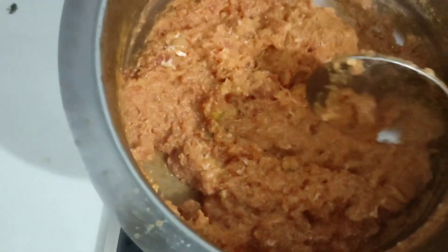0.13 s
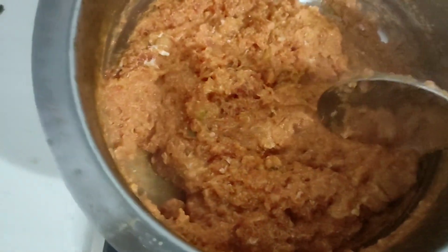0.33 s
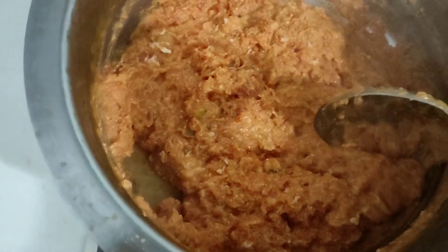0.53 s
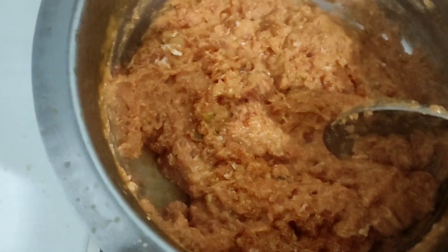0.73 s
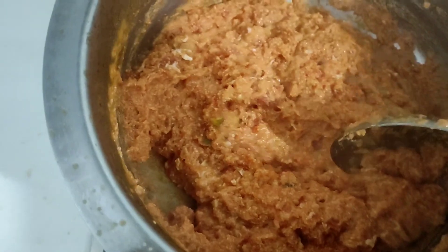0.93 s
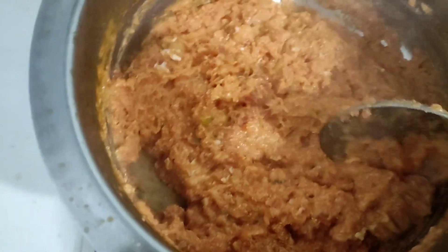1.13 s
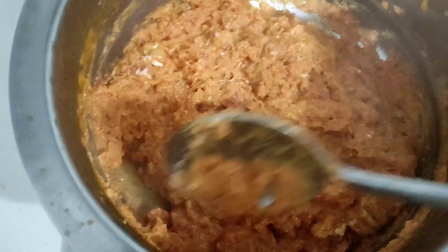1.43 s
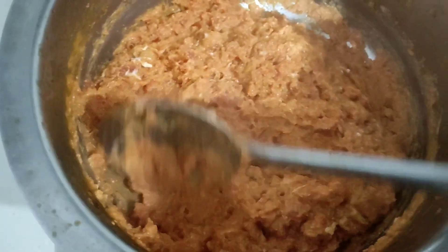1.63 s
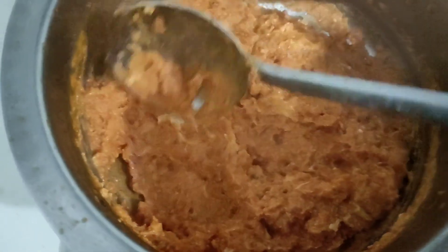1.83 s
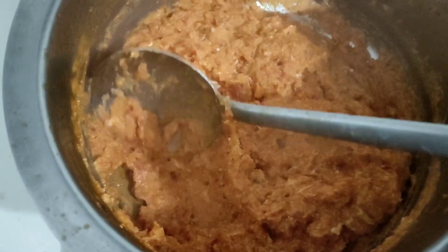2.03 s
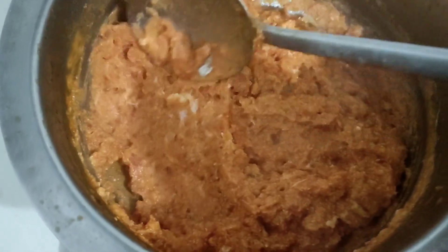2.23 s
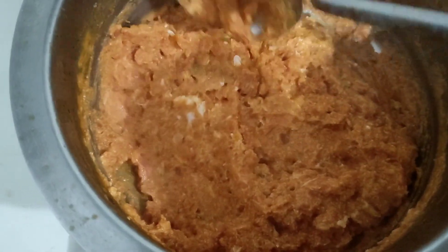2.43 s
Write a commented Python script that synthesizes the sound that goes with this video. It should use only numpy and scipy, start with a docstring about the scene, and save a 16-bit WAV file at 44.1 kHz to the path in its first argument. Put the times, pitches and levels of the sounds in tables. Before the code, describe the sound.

A metal spoon clanks twice on a steel pot of thick food, drags with low hollow groans, taps softly, then strikes one loud ringing clank; faint flame and sizzle behind, close stereo microphone in a small kitchen.

```python
"""Close by, a spoon knocks the wall of a steel pot of thick food, and the wall rings; between the knocks
it drags along the bottom and the loaded pot groans. Behind it the food spits and a flame rumbles.
Knocks are cracks plus decaying modes, groans are sines swayed by random slips, spits and pats are puffs of
noise, the flame is wavering bands of noise, and a low sine hums. Two microphone ports hear it, a few
centimetres apart."""
import sys
import numpy as np
from scipy import signal
from scipy.fft import rfft, irfft, next_fast_len
from scipy.io import wavfile

SR = 44100
rng = np.random.default_rng(int(sys.argv[2]) if len(sys.argv) > 2 else 0)


def wrap_up_sound(samples):
    """Save the sound to the file named by the first command line argument, as 16-bit audio."""
    columns = np.atleast_2d(samples).T
    # keep every value between -1 and 1, then stretch to whole-number steps
    tamed = np.clip(columns, -1, 1)
    steps = np.round(tamed * 32767).astype(np.int16)
    wavfile.write(sys.argv[1], SR, steps)


N = 114660
T = np.arange(N) / SR

HUM_HZ, HUM_DB = 114.5, -48.5
STOVE_DB = -44   # flame and steady sizzle together

SPIT_HALF_WIDTH_HZ, SPIT_LOSS_DB, SPIT_S = 1200, -5, .007
PAT_T60_S = 0.025

LOW_WIDTH_HZ, UPPER_WIDTH_HZ = 37, 50   # how fast the slips sway each groan
SIDE_HZ, SIDE_DB = -41, -7   # a weaker neighbour rides beside the upper groan
SLIPS_PER_S = 1400
GRIT_HZ, GRIT_DB, GRIT_FOLLOWS = 960, -21.5, 0.75   # FOLLOWS: dB gained per dB of drag force
RASP_DB, RASP_FOLLOWS = -16.5, 1.26   # bright grain, growing faster than the force

CRACK_HZ, CRACK_T60_S = 6500, .012
BLOOM_S = 0.005   # the clear modes swell up after the blow
LESSER_MODES, THICKET_DB = 550, -30
APART = 1   # how differently the two ports hear each lesser mode
SLIDE_DB = -5.5   # the spoon slides on after a knock and keeps feeding the crowd
BOTTOM_T60_S = .24
PUFF_HZ, PUFF_DB, PUFF_T60_S = 830, -8.5, 0.29   # broad dull part of each thud

LAG_S, ROOM_DB, ROOM_T60_S = 0.00018, -7.5, 0.042
CEILING, CUTOFF_HZ = .85, 16400


def amp(db):
    """Amplitude factor of a level in dB."""
    return 10 ** (np.asarray(db) / 20)


def unit(x):
    """Scale to rms 1."""
    return x / np.sqrt(np.mean(x ** 2) + 1e-20)


def in_time(rows):
    """Join the rows of a table by straight lines; one curve per column after the time."""
    s, *columns = np.transpose(rows)
    return [np.interp(T, s, column) for column in columns]


def at_hz(points, hz):
    """Read a table of (frequency, value) along a logarithmic frequency axis."""
    points = np.array(points)
    return np.interp(np.log(hz), np.log(points[:, 0]), points[:, 1])


def drift(rate_hz):
    """Slow chance of spread 1: low-passed noise made at every 40th sample."""
    r = np.exp(-80 * np.pi * rate_hz / SR)
    rough = rng.standard_normal(N // 40 + 2002)
    slow = signal.lfilter([1], [1, -2 * r, r * r], rough)[2000:]   # drop the run-in
    return np.interp(np.arange(N) / 40, np.arange(len(slow)), unit(slow))


def add(out, s, x):
    """Mix x into out from time s."""
    i = int(s * SR)
    out[..., i:i + x.shape[-1]] += x[..., :N - i]


def band(x, low_hz, high_hz):
    """Keep the sound between two frequencies."""
    edges = [max(low_hz, 10), min(high_hz, .45 * SR)]
    return signal.sosfilt(signal.butter(2, edges, "band", fs=SR, output="sos"), x)


def narrow(x, width_hz):
    """Low-pass that turns a rough signal into the sway of a mode; rms 1."""
    r = np.exp(-np.pi * width_hz / SR)
    return unit(signal.lfilter([1], [1, -2 * r, r * r], x))


def modes(hz, t60):
    """One decaying sine per row, with a soft first millisecond."""
    t = T[:2 * SR // 3]
    sines = np.sin(2 * np.pi * np.outer(hz, t))
    return sines * amp(-60 * t / np.array(t60)[:, None]) * np.minimum(t * 1000, 1)


def low_hum():
    """A sine wavering slowly in level and phase."""
    level = amp(HUM_DB + 2.2 * drift(7.7))
    return level * np.sin(2 * np.pi * HUM_HZ * T + drift(5.5))


def flame(patchy_db):
    """Rumble of the flame and steady sizzle: third-octave bands of stereo noise, each flickering; rms 1."""
    # noise density: (frequency [Hz], relative level per Hz [dB])
    spectrum = [(25, -40), (60, -67), (90, -9.5), (114, -5), (150, -12), (250, -15.5), (400, -18),
                (700, -27), (1500, -30), (3000, -27.5), (6300, -32), (7200, -30.5), (8600, -30.5),
                (11000, -31.5), (16000, -42)]
    # how alike the two ports hear the noise: (frequency [Hz], left-right likeness [-1 to 1])
    likeness = [(130, 0.97), (600, 0.65), (1500, -0.21), (15000, 0.46)]
    out, together = 0, drift(4.0)
    edges = 25 * 2 ** np.arange(0, 9.5, 1 / 3)
    white = rng.standard_normal((2, 2, N))
    for k, (low, high) in enumerate(zip(edges, edges[1:])):
        hz = np.sqrt(low * high)
        if spectrum[0][0] < hz < spectrum[-1][0]:
            mid, side = band(white[k % 2], low, high)
            alike = np.clip(at_hz(likeness, hz), -1, 1)
            flicker_db = patchy_db * (0.79 * together + drift(10.7))
            gain = amp(at_hz(spectrum, hz) + flicker_db)
            out = out + gain * (np.sqrt(1 + alike) * mid + np.sqrt(1 - alike) * side * [[1], [-1]])
    return unit(out)


def food():
    """Soft pats of the spoon are dull decaying noise; spits of hot fat are short bright puffs."""
    # pats on the food: (time [s], level at the start [dB])
    pats = [(1.669, -41), (1.754, -35), (1.793, -41), (1.874, -39), (1.925, -38), (2.523, -34)]
    # spits: (time [s], level before SPIT_LOSS_DB [dB], centre frequency [Hz])
    spits = [(0.459, -33.5, 6350), (0.9387, -28, 3260), (1.277, -30, 7600), (1.6333, -34, 6880),
             (2.1828, -27.5, 7500), (2.2493, -32, 8400)]
    out = np.zeros(N)
    for s, db in pats:
        thump = unit(band(rng.standard_normal(2000), 210, 2080))
        add(out, s, amp(db - 60 * T[:2000] / PAT_T60_S) * thump)
    t = T[:4000] / SPIT_S
    swell = np.sqrt(np.minimum(8 * t, 1)) * np.exp(-t ** 2)
    for s, db, hz in spits:
        puff = unit(band(rng.standard_normal(4000), hz - SPIT_HALF_WIDTH_HZ, hz + SPIT_HALF_WIDTH_HZ))
        add(out, s, amp(db + SPIT_LOSS_DB) * puff * swell)
    return out


def groan(slips, hz, width_hz, steady):
    """A low mode kept swaying by the slips in level and phase, around a steady part; rms 1."""
    phase = 2 * np.pi * np.cumsum(hz) / SR
    in_step = (steady + narrow(slips[0], width_hz)) * np.cos(phase)
    across = narrow(slips[1], width_hz) * np.sin(phase)
    return unit(in_step + across)


def drag():
    """Dense uneven slips keep the low modes swaying and leave a dull grit and a bright rasp around them."""
    # force of the drag: (time [s], low groan level [dB], upper groan level [dB])
    force = [(.3, -33.5, -68), (.335, -33.5, -19.5), (.372, -28.5, -34), (.43, -42, -29.5),
             (.53, -32, -28.5), (.545, -20, -19), (.616, -18.5, -17), (.645, -23.5, -42), (.69, -29, -36),
             (.73, -38, -33), (.814, -34, -30.5), (.86, -23.5, -26.5), (.924, -16.5, -47),
             (.944, -16.5, -15.5), (.96, -18.5, -26), (.99, -25.5, -41), (1.074, -43.5, -42),
             (1.082, -32, -42), (1.126, -50, -37), (1.15, -28.5, -33.5), (1.195, -35.5, -55),
             (1.32, -53.5, -57)]
    # the load bends the groans: (time [s], low groan [Hz], upper groan [Hz])
    bend = [(.3, 343.8, 465), (.5, 355.9, 480), (.56, 352.5, 506.8), (.65, 383.7, 480.6), (.72, 358.2, 505),
            (.92, 376, 435), (.94, 373, 500), (1.3, 390.8, 481.2)]
    low_db, upper_db = in_time(force)
    low_hz, upper_hz = in_time(bend)
    fade_in = np.clip((T - force[0][0]) * 100, 0, 1)
    fade_out = np.clip(1 + (force[-1][0] - T) * 10, 0, 1)
    slips = (rng.random((2, N)) < SLIPS_PER_S / SR) * rng.standard_normal((2, N))
    low = groan(slips, low_hz, LOW_WIDTH_HZ, steady=2.0)
    upper = groan(slips, upper_hz, UPPER_WIDTH_HZ, steady=2.5)
    upper = upper + amp(SIDE_DB) * groan(slips, upper_hz + SIDE_HZ, UPPER_WIDTH_HZ, steady=1.5)
    grit = unit(band(slips[0], 110, GRIT_HZ))
    rasp = unit(band(slips[1], 1350, 2930))
    force_db = np.maximum(low_db, upper_db)
    groans = amp(low_db) * low + amp(upper_db) * upper
    grain = amp(GRIT_DB + GRIT_FOLLOWS * force_db) * grit + amp(RASP_DB + RASP_FOLLOWS * force_db) * rasp
    return fade_in * fade_out * (groans + grain)


def knocks():
    """Each knock is a bright crack that sets the clear modes, a crowd of lesser ones and the bottom ringing."""
    # blows: (time [s], crack and crowd level [dB], ring of the wall [dB],
    #         thud of the loaded bottom [dB], slide after the blow [s])
    blows = [(0.2473, -4, -20.5, -27.5, 0.098), (0.322, -10.5, -26, -24, 0.024),
             (1.0774, -21.5, -67, -25, 0.0096), (1.132, -23, -60, -26.5, 0.031),
             (1.1987, -23, -39, -32.5, 0.093), (1.9552, -4.5, -19.5, -16, 0.13),
             (2.0992, -49, -29.5, -35, 0.0092)]
    # where each blow lands: (0 rim, 1 high on the wall, 2 low on the wall)
    spots = [0, 0, 0, 0, 1, 2, 2]
    # clear modes of the wall: (frequency [Hz], t60 [s],
    #         level when struck at the rim [dB], high on the wall [dB], low on the wall [dB])
    wall = np.array([(985, .45, 2, -18, 0), (998, .85, -9, 2, -6), (1091, .4, -5, -25, -25),
                     (1239, 1.0, -20, -30, -12), (1660, .4, -12, 5, -15), (1716, .4, -14, -20, -13),
                     (1823, .5, -3, 2, -28), (2115, .55, -3, 1, -12), (2249, .35, -10, -12, -13)])
    # crowd of lesser modes: (frequency [Hz], relative level [dB])
    thicket = [(600, -6), (1300, -4.5), (2200, -0.5), (3300, -12.5), (3750, 0.5), (4050, -12), (4400, 1),
               (4800, -27), (5300, -8.5), (6150, -1.5), (7200, -12.5), (8600, -1), (11000, -20),
               (16000, -14)]
    # decay of the crowd before each mode's random spread: (frequency [Hz], t60 [s])
    thicket_t60 = [(600, 0.26), (3000, 0.24), (16000, 0.12)]
    # modes of the loaded bottom: (frequency [Hz], relative level [dB])
    bottom = np.array([(55, -19), (165, -15.5), (222, -10.5), (314, -11.5), (393, 1), (426, 1), (460, -2),
                       (499, -0.5)])

    out = np.zeros((2, N))
    clear = modes(wall[:, 0], wall[:, 1])
    clear = clear * (1 - np.exp(-T[:clear.shape[1]] / BLOOM_S))
    low = modes(bottom[:, 0], np.full(len(bottom), BOTTOM_T60_S))
    signs = (-1) ** np.arange(len(bottom))
    places = (np.arange(LESSER_MODES) + rng.random(LESSER_MODES)) / LESSER_MODES
    crowd_hz = 600 + 15400 * places ** 1.3
    crowd = modes(crowd_hz, at_hz(thicket_t60, crowd_hz) * rng.uniform(0.85, 2.15, LESSER_MODES))
    t = T[:SR // 5]
    for (s, peak_db, ring_db, thud_db, slide_s), spot in zip(blows, spots):
        noise = rng.standard_normal((4, len(t)))
        shares = rng.uniform(-0.69, 1, (3, LESSER_MODES))   # one common, then one for each port

        rub = noise[1] ** 3 * amp(5.2 * drift(35.0)[:len(t)]) * (t < slide_s)   # cubed: uneven
        push = amp(SLIDE_DB) * rub / np.sqrt(SR) + (t == 0)   # the blow itself, then the slide
        crowd_gain = amp(peak_db + THICKET_DB + at_hz(thicket, crowd_hz))
        lesser = (crowd_gain * (shares[0] + APART * shares[1:])) @ crowd
        add(out, s, signal.fftconvolve(lesser, push[None]))

        add(out, s, amp(ring_db + wall[:, 2 + spot]) @ clear)

        add(out, s, (amp(thud_db + bottom[:, 1]) * signs) @ low)
        puff = unit(band(noise[2] + .5 * noise[2:], 190, PUFF_HZ))
        add(out, s, amp(thud_db + PUFF_DB - 60 * t / PUFF_T60_S) * puff)

        crack = unit(band(noise[0], 1200, 16500))
        crack = crack + .5 * unit(band(noise[0], CRACK_HZ - 600, CRACK_HZ + 600))
        add(out, s, amp(peak_db - 60 * t / CRACK_T60_S) * crack * np.minimum(t * 1000, 1))
    return out


def ports(x):
    """Both ports hear the pot, the left a little later, plus the room, which reaches them in opposite sense."""
    size = next_fast_len(N + SR)
    hz = np.maximum(np.arange(size // 2 + 1) * SR / size, 1)
    t = T[:SR // 2]
    tail = rng.standard_normal(SR // 2) * [[1], [-1]] * amp(-60 * t / ROOM_T60_S) * (t > .003)
    tail = tail / np.sqrt((tail ** 2).sum(1, keepdims=True))
    room = amp(ROOM_DB) * rfft(tail, size) * hz / (hz + 700)   # thinner in the bass
    direct = np.array([np.exp(-2j * np.pi * hz * LAG_S), np.ones_like(hz)])
    return irfft(rfft(x, size) * (direct + room), size)[:, :N]


def scene():
    """The pot at the two ports, over the flame and the hum."""
    background = low_hum() + amp(STOVE_DB) * flame(patchy_db=3.36)
    pot = food() + drag() + knocks()
    return background + ports(pot)


def record(dry):
    """Each port has its own colour; peaks are rounded; the top is cut."""
    # colour of the ports: (frequency [Hz], left minus right [dB])
    port_colour = [(800, .5), (1500, -1), (3000, -5), (7000, -4), (10000, 0), (15000, 8)]
    hz = np.maximum(np.arange(N // 2 + 1) * SR / N, 1)
    colour_db = at_hz(port_colour, hz) / 2 * np.array([[1], [-1]])
    coloured = irfft(rfft(dry) * amp(colour_db), N)
    rounded = CEILING * np.tanh(coloured / CEILING)
    return signal.sosfilt(signal.cheby2(14, 80, CUTOFF_HZ, fs=SR, output="sos"), rounded)


dry = scene()
out = record(dry)
wrap_up_sound(out)
```